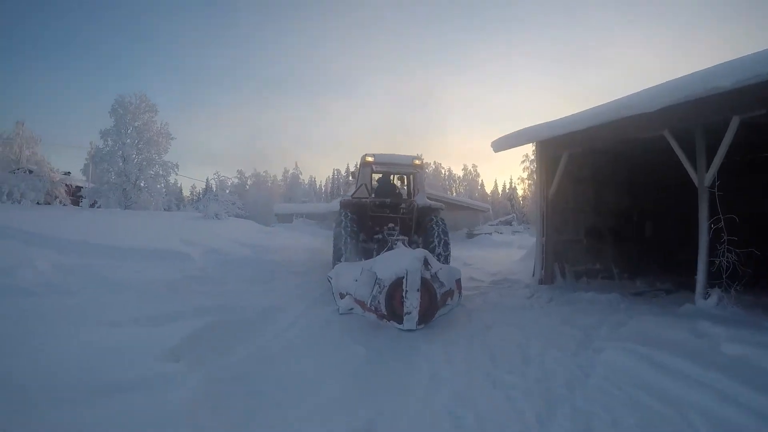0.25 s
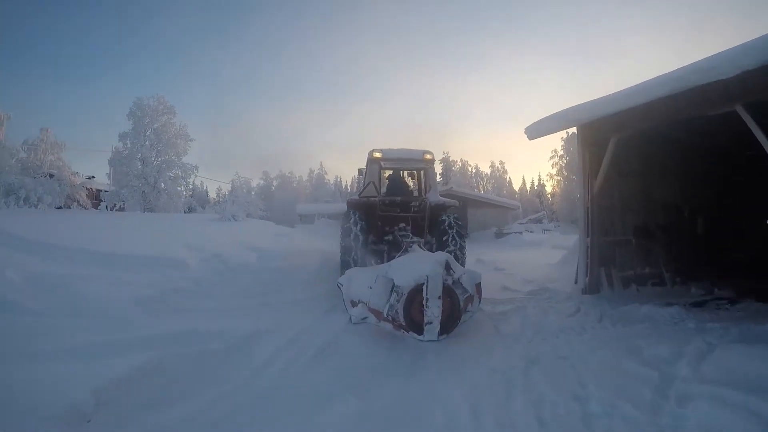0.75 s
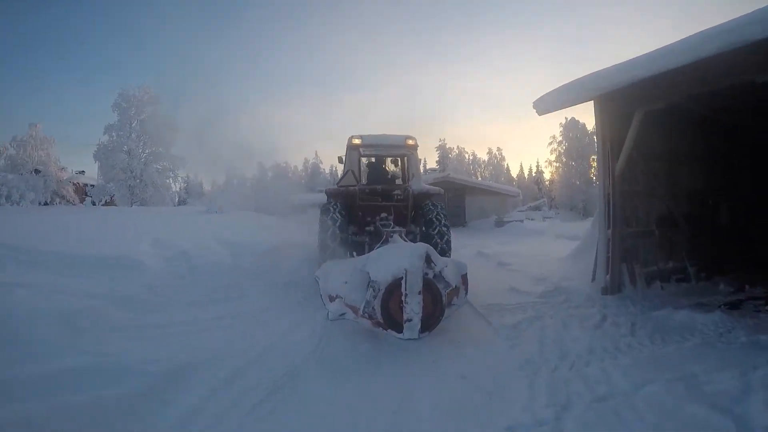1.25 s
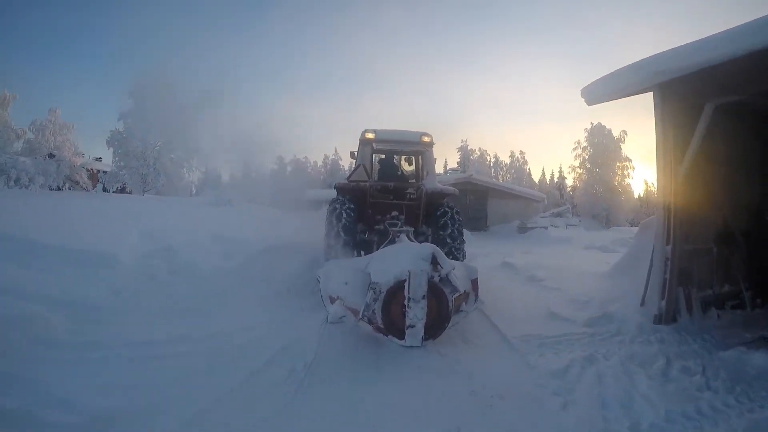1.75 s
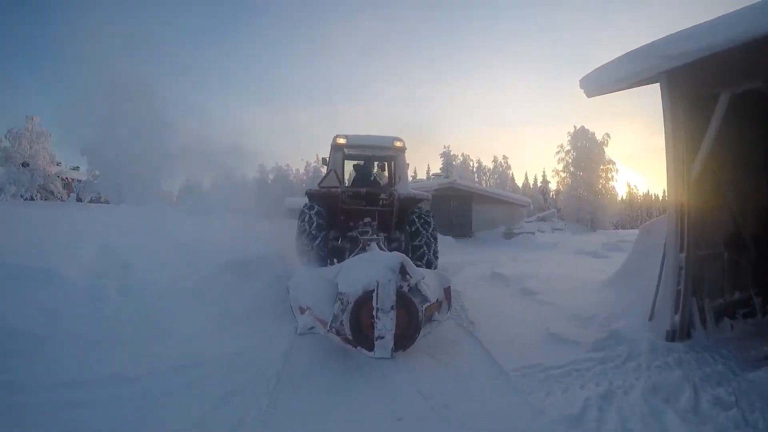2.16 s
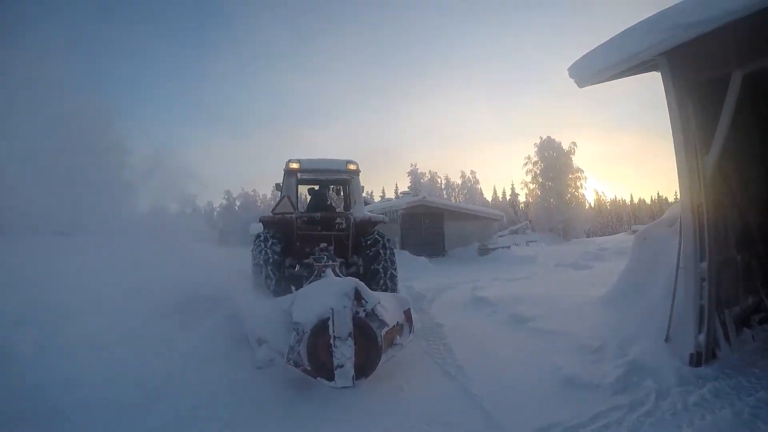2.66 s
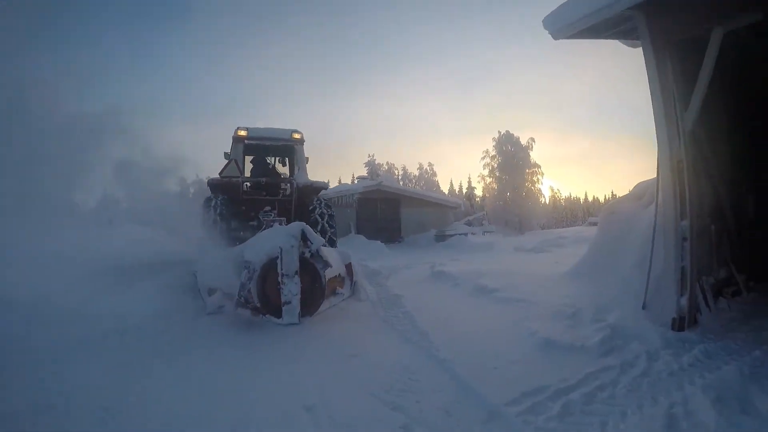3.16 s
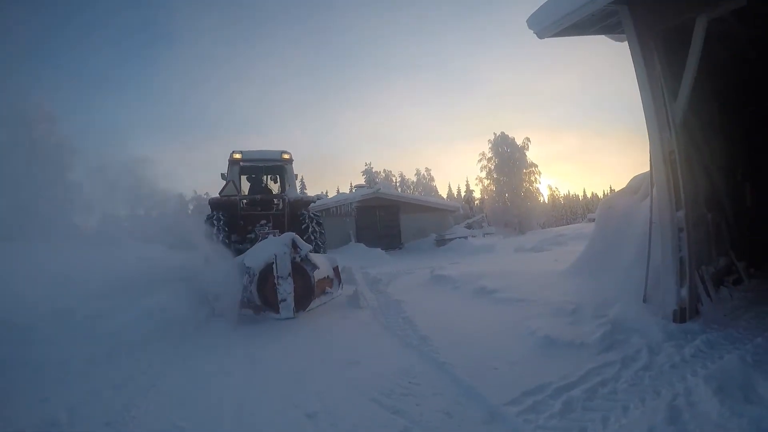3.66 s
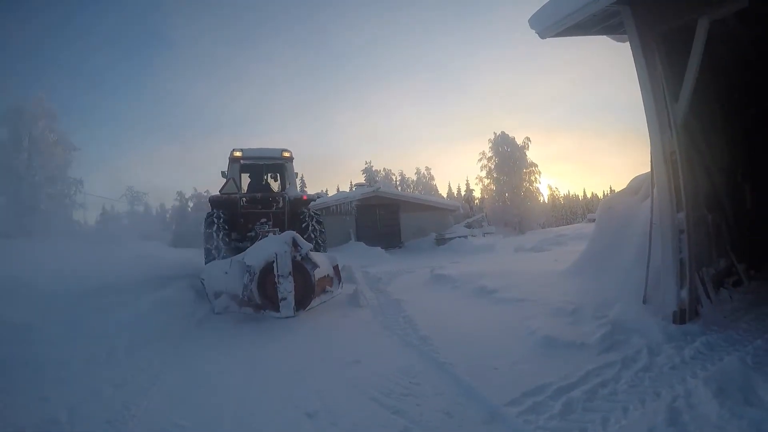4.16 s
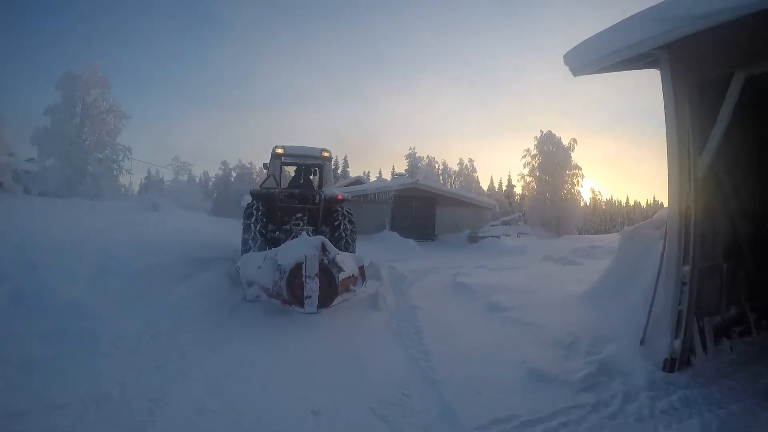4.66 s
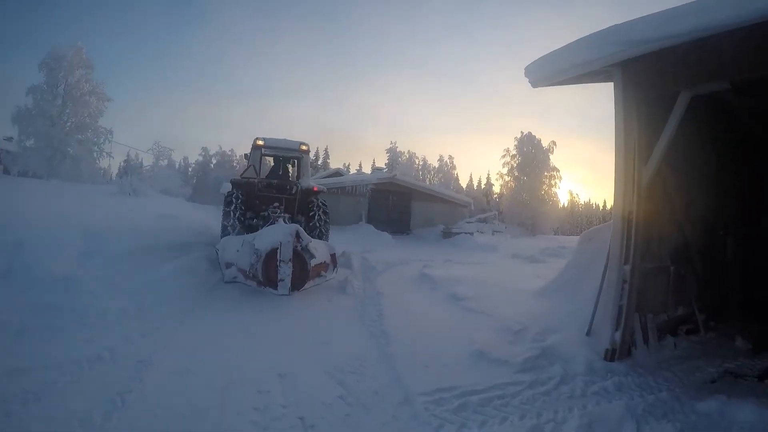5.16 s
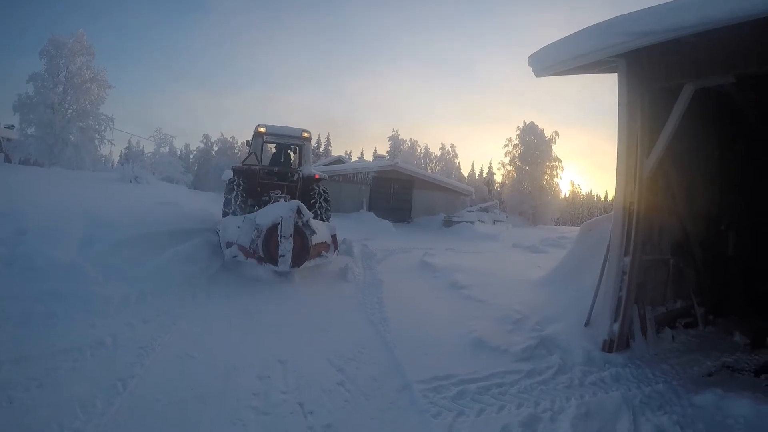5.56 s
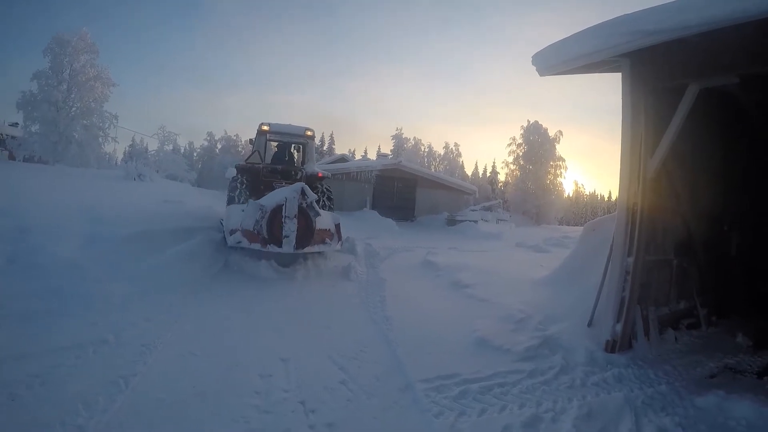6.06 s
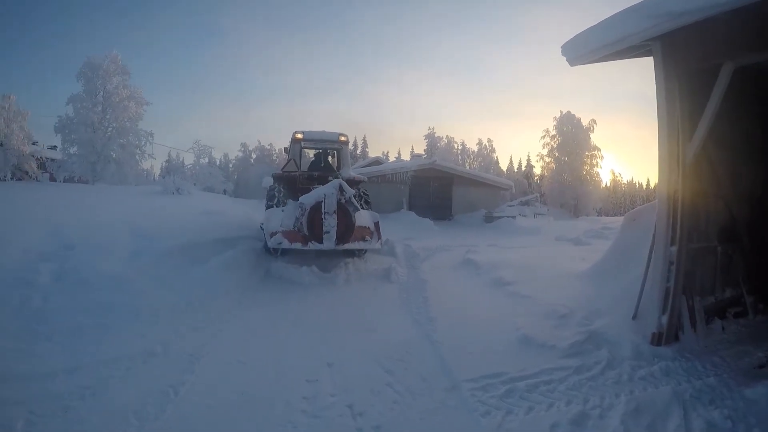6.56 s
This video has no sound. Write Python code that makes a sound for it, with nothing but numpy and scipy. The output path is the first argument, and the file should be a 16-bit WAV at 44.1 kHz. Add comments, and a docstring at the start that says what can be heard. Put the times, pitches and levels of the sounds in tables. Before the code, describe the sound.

A tractor engine rumbles and a snowblower hums and hisses across snow, then loud glove rubbing and knocks hit the housing before a faint rattling diesel idle.

```python
"""Engine rumble and a rising blade tone come first, with the hiss of thrown snow: a tractor drives a
snowblower across a snowy yard, heard through a small camera's closed housing. Shaped noise and sines.
A gloved hand rubs (grainy noise), squeaks (slip partials) and knocks (decaying sines) the housing,
and its mount is left ringing low. Later the idling diesel rattles sheet metal: noise in panel bands."""
import sys
import numpy as np
from scipy import signal
from scipy.fft import rfft, irfft, next_fast_len
from scipy.io import wavfile
from scipy.ndimage import uniform_filter1d

SR = 44100
rng = np.random.default_rng(int(sys.argv[2]) if len(sys.argv) > 2 else 0)


def master_out(mix):
    """Clip the mix to full scale and print it as 16-bit PCM to the path in sys.argv[1]."""
    frames = np.transpose(np.atleast_2d(mix))
    ceiling = np.clip(frames, -1, 1)
    pcm = np.round(ceiling * 32767).astype(np.int16)
    wavfile.write(sys.argv[1], SR, pcm)


N = 300577


def amp(db):
    """Decibels to gain."""
    return 10 ** (np.asarray(db) / 20)


def rms_one(x):
    """Scale to unit rms."""
    return x / np.sqrt(np.mean(x ** 2) + 1e-20)


def clock_s():
    """Time of each sample."""
    return np.arange(N) / SR


def noise():
    """White noise."""
    return rng.standard_normal(N)


def in_time(rows):
    """Interpolate each column of a curve table to one value a sample."""
    s, *columns = np.transpose(rows)
    return [np.interp(clock_s(), s, c) for c in columns]


def colour(x, spectrum):
    """Shape x by a (Hz, dB) spectrum, log-frequency interpolation; rms 1."""
    size = next_fast_len(N)
    hz, db = np.transpose(spectrum)
    grid_hz = np.maximum(np.arange(size // 2 + 1) * SR / size, 1)
    gain = amp(np.interp(np.log(grid_hz), np.log(hz), db))
    return rms_one(irfft(rfft(x, size) * gain, size)[:N])


def bandpass(x, low_hz, high_hz):
    """Butterworth band-pass, level kept."""
    return signal.sosfilt(signal.butter(2, [low_hz, high_hz], "band", fs=SR, output="sos"), x)


def band(x, low_hz, high_hz):
    """Band-pass, rms 1."""
    return rms_one(bandpass(x, low_hz, high_hz))


def drift(rate_hz):
    """Slow random wander of spread 1: two-pole low-passed noise."""
    step = 40   # samples per slow value
    r = np.exp(-2 * np.pi * step * rate_hz / SR)
    settle = 2000
    slow = signal.lfilter([1], [1, -2 * r, r * r], rng.standard_normal(N // step + 2 + settle))[settle:]
    return np.interp(np.arange(N) / step, np.arange(len(slow)), rms_one(slow))


def ring(s, hz, t60_s):
    """Exponentially decaying sine, initial height 1, starting at s."""
    t = np.maximum(clock_s() - s, 0)
    return np.sin(2 * np.pi * hz * t) * amp(-60 * t / t60_s)


def bursts(s, db, rise_s, fall_s):
    """Envelope of short bursts: quick rise, exponential fall, peak at db."""
    marks = np.full(N, 1e-12)
    marks[(np.array(s) * SR).astype(int)] = amp(db)
    t = np.arange(int(8 * fall_s * SR)) / SR
    shape = np.exp(-t / fall_s) * (1 - np.exp(-t / rise_s))
    return signal.fftconvolve(marks, shape / shape.max())[:N]


# tractor, muffled while the housing is gripped: [t/s, rumble level/dB, body drone level/dB, hiss level/dB]
TRACTOR_CURVE = [(0.0, -39, -55.5, -59), (1.3, -43.5, -51.5, -53.5), (3.0, -39, -48, -55),
                 (3.55, -49, -51, -60), (3.76, -71, -61, -62), (4.08, -71, -57, -60.5),
                 (4.3, -35.5, -45, -59), (4.42, -40, -57, -62), (6.2, -50.5, -57.5, -65),
                 (6.55, -48, -55.5, -66), (6.82, -48, -56.5, -62)]
# blower fan, runs up, holds its pitch, then fades out: [t/s, blade rate f/Hz, tone level/dB,
# overtone level/dB]
BLOWER_CURVE = [(0.0, 128.8, -52.5, -58.5), (0.6, 164.2, -46.5, -57), (3.0, 171, -49.5, -54.5),
                (3.5, 169, -65.5, -69.5), (4.1, 169.8, -62.5, -74), (4.6, 171.5, -83, -82)]


def tractor():
    """Engine and blower together; drone and hiss share one lumpy wander, tones and throb one fan phase."""
    rumble_db, drone_db, hiss_db = in_time(TRACTOR_CURVE)
    blade_hz, tone_db, overtone_db = in_time(BLOWER_CURVE)
    blade_phase = 2 * np.pi * np.cumsum(blade_hz * (1 + .003 * drift(3.4))) / SR
    lumps = drift(14)
    engine = exhaust_rumble(rumble_db) + body_drone(drone_db, lumps)
    tones = blade_tones(blade_phase, tone_db, overtone_db)
    return engine + tones + snow_hiss(blade_phase, tone_db, hiss_db, lumps)


# exhaust rumble spectrum: [f/Hz, relative level/dB per Hz]
RUMBLE_SPECTRUM = [(15, -57.5), (25, -32), (38, -16), (54, -18.5), (77, -5.5), (96, 0.5), (112, -2),
                   (200, -21.5), (260, -51), (440, -120)]


def exhaust_rumble(level_db):
    """Exhaust: low shaped noise with lumpy level."""
    return amp(level_db + 1.9 * drift(21)) * colour(noise(), RUMBLE_SPECTRUM)


# body drone spectrum: [f/Hz, relative level/dB per Hz]
DRONE_SPECTRUM = [(88, -45.5), (150, -4), (215, -11), (273, -3.5), (351, -14), (519, -15), (690, -29),
                  (822, -27.5), (979, -32), (1100, -35), (1430, -63), (2420, -120)]


def body_drone(level_db, lumps):
    """Tractor body: mid-low shaped noise with lumpy level."""
    return amp(level_db + 1.6 * lumps) * colour(noise(), DRONE_SPECTRUM)


def blade_tones(blade_phase, tone_db, overtone_db):
    """Fan: sines at the blade rate and its octave, plus a weaker shaft order at 3/2 between them."""
    tone = amp(tone_db + 1.5 * drift(2.7)) * np.sin(blade_phase)
    overtone = amp(overtone_db + 1.4 * drift(5.2)) * np.sin(2 * blade_phase)
    shaft_order = amp(overtone_db - 6.0 + 1.2 * drift(2)) * np.sin(3 * blade_phase / 2)
    return np.sqrt(2) * (tone + overtone) + shaft_order


BLADES, THROB_DB = 4, 1.3
# snow and engine noise through the housing: [f/Hz, relative level/dB per Hz]
HISS_SPECTRUM = [(410, -20), (700, 0.5), (984, -12), (1180, -6.5), (1680, -9), (1940, -5), (3280, -15.5),
                 (3890, -11.5), (5470, -13.5), (6150, -8.5), (9860, -11.5), (10800, -4), (11800, -13),
                 (13500, -7.5), (16000, -16)]
# hiss once the blower has stopped throwing: [f/Hz, relative level/dB per Hz]
FAR_HISS_SPECTRUM = [(410, -30), (700, 0.5), (1020, -9), (1480, -5.5), (4210, -12.5), (6150, -9),
                     (7290, -9.5), (10700, -7.5), (16000, -12)]


def snow_hiss(blade_phase, tone_db, hiss_db, lumps):
    """Thrown snow: noise throbbing once per fan turn, crossfading to the far hiss as the tone fades."""
    throwing = np.clip((tone_db + 68) / 15, 0, 1)
    throb_db = THROB_DB * throwing * np.sin(blade_phase / BLADES)
    level = amp(hiss_db + throb_db + 0.49 * lumps + .9 * drift(25))
    near = np.sqrt(throwing) * colour(noise(), HISS_SPECTRUM)
    far = np.sqrt(1 - throwing) * colour(noise(), FAR_HISS_SPECTRUM)
    return level * (near + far)


SMALL_LUMPS_PER_S, SMALL_LUMP_MIN_DB, SMALL_LUMP_RANGE_DB = 4.0, -57, 6
THROWING_START_S, THROWING_END_S = 0.37, 3.0
DULL_DB = -9.5   # duller part, re each lump
# big lumps of snow in the blower: [t/s, envelope peak level/dB]
BIG_LUMPS = [(1.246, -45.5), (1.4402, -45), (1.5886, -52), (2.134, -50), (2.2489, -47), (2.3219, -44.5),
             (2.442, -38.5), (2.604, -43.5)]


def snow_lumps():
    """Lumps hit the blower: milliseconds of bright noise with a duller part; small ones at random times."""
    span_s = THROWING_END_S - THROWING_START_S
    when, size = rng.random((int(SMALL_LUMPS_PER_S * span_s), 2)).T
    small = [THROWING_START_S + span_s * when, SMALL_LUMP_MIN_DB + SMALL_LUMP_RANGE_DB * size]
    s, db = np.hstack([np.transpose(BIG_LUMPS), small])
    bright = bursts(s, db, 0.00043, 0.0048) * band(colour(noise(), HISS_SPECTRUM), 2800, 20000)
    dull = bursts(s, db + DULL_DB, 0.00036, 0.0096) * band(noise(), 1560, 2420)
    return bright + dull


SHOWER_S, SHOWER_GAP_S, SHOWER_DB, SHOWER_GRAINS = 1.131, 0.012, -50.5, 6
# single ice grains: [t/s, envelope peak level/dB]
ICE_GRAINS = [(0.1462, -48.5), (0.9772, -45), (1.9994, -49.5)]


def ice_grains():
    """Small ice grains tinkle: short high noise bursts, singly and in one irregular row."""
    shower = [(SHOWER_S + SHOWER_GAP_S * (k + rng.uniform(-0.48, 0.23)), SHOWER_DB)
              for k in range(SHOWER_GRAINS)]
    s, db = np.transpose(ICE_GRAINS + shower)
    return bursts(s, db, .0005, 0.0036) * band(noise(), 9400, 14500)


GRID_START_S, FIRING_S, FIRINGS, LEAD_S = 4.9626, 0.0509, 37, .002   # bursts start LEAD_S before the grid
HURRY_FROM_S, HURRY_S_PER_S2 = 6.13, 0.033   # the idle then speeds up slightly
PANELS_DB, RATTLE_DB, EVERY_OTHER_DB, SPREAD_DB = -54, -59.5, 0.3, 1.1
PANELS_FULL_S, PANELS_GROW_DB_PER_S = 6.42, 8   # the panels join in gradually
PANELS_FADE_S, PANELS_FADE_DB_PER_S = 6.31, 13   # and recede with distance
SECOND_S, SECOND_DB = 0.0141, -6   # each firing is heard as two bursts
# sheet-metal panel resonances: [f/Hz, width/Hz, relative level/dB]
PANEL_MODES = [(526, 350, -1.5), (800, 61, -0.5), (1480, 32, -3), (1636, 106, -6.5), (1890, 310, -1.5),
               (2466, 190, -2.5)]


def diesel_idle():
    """Idling diesel fires about 20 times a second, shaking sheet metal: panel-band noise, bright rattle."""
    firing = np.arange(FIRINGS)
    grid_s = GRID_START_S + FIRING_S * firing
    s = grid_s - HURRY_S_PER_S2 * np.maximum(grid_s - HURRY_FROM_S, 0) ** 2 - LEAD_S
    vary_db = SPREAD_DB * rng.standard_normal(FIRINGS) + EVERY_OTHER_DB * (-1) ** (firing + 1)
    growth_db = -PANELS_GROW_DB_PER_S * np.maximum(PANELS_FULL_S - s, 0)
    fade_db = -PANELS_FADE_DB_PER_S * np.maximum(s - PANELS_FADE_S, 0)
    first = np.array([s, PANELS_DB + vary_db + growth_db + fade_db, RATTLE_DB + vary_db])
    second = first + np.array([[SECOND_S], [SECOND_DB], [SECOND_DB]])
    s, panels_db, rattle_db = np.hstack([first, second])
    shake, panels = noise(), 0
    for hz, width_hz, level_db in PANEL_MODES:
        panels = panels + amp(level_db) * band(shake, hz - width_hz / 2, hz + width_hz / 2)
    rattle = band(colour(noise(), HISS_SPECTRUM), 2900, 12700)
    shaken = bursts(s, panels_db, 0.00033, 0.0087) * rms_one(panels)
    return shaken + bursts(s, rattle_db, 0.00061, 0.0071) * rattle


RELEASE_DB_PER_S = 699   # after the drop
SNAP_DB, SNAP_MIN_DROP_DB = 0.5, 10   # the fabric snaps free where the drop is deeper than this
# glove strokes: [start t/s, length/s, final level/dB, swell start to end/dB, drop on letting go/dB]
STROKES = [(3.038, .012, -4, 8, 12), (3.074, 0.029, -11.5, 1.1, 11.5), (3.148, 0.097, -8.5, 33, 20),
           (3.268, 0.032, -35, 9, 5), (3.299, 0.015, -6.5, 14.5, 18.5), (3.318, 0.0076, -9, 0.5, 9.5),
           (3.327, .04, -19.5, 2, 10), (3.382, .012, -11, 23, 15), (3.41, 0.02, -25.5, -3, 11),
           (3.433, 0.011, -29, -2, 3), (4.113, 0.028, -35, 12, 0.1), (4.138, 0.035, -33, 1.5, 3),
           (4.181, 0.034, -34.5, 7.5, 1)]


def strokes():
    """Stroke envelope: level runs linearly in dB, drops on letting go; deep drops add a snap burst."""
    t, out = clock_s(), np.zeros(N)
    for start, length, db, swell_db, drop_db in STROKES:
        left = start + length - t
        change_db = np.where(left > 0, -swell_db * left / length, RELEASE_DB_PER_S * left - drop_db)
        out = np.maximum(out, (t >= start) * amp(np.minimum(db + change_db, 0)))
    snapping = [row for row in STROKES if row[-1] > SNAP_MIN_DROP_DB]
    start, length, db, _, _ = np.transpose(snapping)
    snaps = bursts(start + length - .001, db + SNAP_DB, .0002, .0007)
    return uniform_filter1d(out, size=40) + snaps


SOFT_FROM_S = 4.0
RANGE_EDGES_HZ = [600, 1500, 3500, 5500, 7600, 10500, 16500]
# glove fabric on the housing: [f/Hz, relative level/dB per Hz]
RUB_SPECTRUM = [(410, -34.5), (700, -13.5), (886, -14), (1380, -34), (1680, -34.5), (2080, -21.5),
                (2730, -12.5), (3280, -16), (4730, -11.5), (6150, 2), (7790, -5.5), (9110, 3),
                (11200, -7.5), (13100, -7), (16000, -20.5)]
# a lighter, slower stroke: [f/Hz, relative level/dB per Hz]
SOFT_RUB_SPECTRUM = [(1060, -67), (1800, -33), (2120, -18), (3320, -20.5), (3810, -3), (4740, -12.5),
                     (6470, 5.5), (7220, -7.5), (8520, -7), (13100, -11), (16000, -20)]
# small clicks of the glove on the housing: [t/s, envelope peak level/dB]
GLOVE_TAPS = [(3.598, -45.5), (3.6421, -52), (3.6964, -59.5), (4.03, -46.5), (4.1914, -53), (4.215, -39)]


def glove():
    """Rubbing: grainy noise under each stroke, patchy in colour, which also pushes the housing; taps."""
    stroke = strokes()
    hard, soft = colour(noise(), RUB_SPECTRUM), colour(noise(), SOFT_RUB_SPECTRUM)
    fabric = np.where(clock_s() < SOFT_FROM_S, hard, soft)
    grain, rub = drift(150), 0
    for low_hz, high_hz in zip(RANGE_EDGES_HZ, RANGE_EDGES_HZ[1:]):
        # the contact point wanders, so each range swells on its own
        rub = rub + amp(2 * grain + 1.6 * drift(60)) * bandpass(fabric, low_hz, high_hz)
    s, db = np.transpose(GLOVE_TAPS)
    taps = bursts(s, db, 0.00028, 0.0012) * fabric
    push = amp(-8.0) * band(noise(), 120, 270.0) + amp(-34.5) * band(noise(), 760, 1054)
    return stroke * (rub + push) + taps


UNSTEADY, SWELL_S = 0.011, 0.0089   # relative slip-rate wander; fade in and out
# stick-slip squeaks: [start t/s, turn t/s, end t/s, slip rate f/Hz at these three moments (3 columns),
# level/dB, extra level/dB of partials near 4 kHz]
SLIPS = [(3.18, 3.212, 3.226, 810, 1330, 1340, -25, 4), (3.274, 3.299, 3.317, 1015, 965, 690, -24, -16),
         (3.74, 3.758, 3.787, 680, 880, 915, -53, 12), (3.835, 3.85, 3.86, 900, 1000, 1040, -61, -10)]
# partial levels as shaped by the housing: [f/Hz, relative level/dB]
SQUEAK_SPECTRUM = [(1600, -26), (2000, -15), (2400, -28), (3500, -13.5), (4500, -23), (5800, -16.5),
                   (7000, -6), (8500, -9.5), (10500, 3), (13500, -7), (15000, -30.5)]


def squeaks():
    """Stick-slip: regular slips give a stack of partials, slightly unsteady, shaped by the housing."""
    t, out = clock_s(), np.zeros(N)
    shape_hz, shape_db = np.transpose(SQUEAK_SPECTRUM)
    k = np.arange(1, 16)[:, None]   # partial numbers
    for start, turn, end, hz0, hz1, hz2, db, mid_db in SLIPS:
        now = (t >= start) & (t < end)
        glide_hz = np.interp(t[now], [start, turn, end], [hz0, hz1, hz2])
        slips_hz = glide_hz * (1 + UNSTEADY * drift(150)[now])
        partials_hz = k * slips_hz
        near_4k = np.abs(partials_hz - 4300) < 1700
        gains = amp(np.interp(partials_hz, shape_hz, shape_db) + mid_db * near_4k)
        phase = 2 * np.pi * k * np.cumsum(slips_hz) / SR + k ** 2   # k ** 2 spreads the start phases
        stack = np.sum(gains * np.sin(phase), axis=0)
        swell = np.clip(np.minimum(t[now] - start, end - t[now]) / SWELL_S, 0, 1)
        out[now] = amp(db) * swell * rms_one(stack)
    return out


GRIP_T60_S, PANEL_SPREAD_DB = 0.049, 3.0   # ring of the main pitch; chance in panel level
# knocks on the housing: [t/s, start level/dB before filtering, main pitch f/Hz]
HOUSING_KNOCKS = [(3.042, -13.5, 194), (3.051, -2, 193), (3.084, -17.5, 178), (3.106, -6.5, 96.5),
                  (3.245, -2.5, 255), (3.255, -6, 118), (3.263, -12, 275), (3.281, -6.5, 105),
                  (3.312, -4.5, 170), (3.323, -9.5, 200), (3.340, -14, 254), (3.354, -9, 111.4),
                  (3.366, -5, 270), (3.397, -4, 221), (3.417, -9, 284), (3.429, -8.5, 307),
                  (4.121, -34.5, 235), (4.138, -23, 301), (4.186, -28, 138), (4.208, -20.5, 244),
                  (4.23, -27, 120), (5.924, -44, 295)]
# housing panels: [f/Hz, level re knock/dB, t60/s]
HOUSING_PANELS = [(388, -7, .04), (878, -13, 0.029)]


def knocks():
    """Each knock rings the housing panels briefly; how it is held sets the main pitch."""
    out = 0
    chances = rng.standard_normal((len(HOUSING_KNOCKS), len(HOUSING_PANELS)))
    for (s, db, hz), chance in zip(HOUSING_KNOCKS, chances):
        out = out + amp(db) * ring(s, hz, GRIP_T60_S)
        for (panel_hz, panel_db, t60_s), c in zip(HOUSING_PANELS, chance):
            out = out + amp(db + panel_db + PANEL_SPREAD_DB * c) * ring(s, panel_hz, t60_s)
    soft = signal.butter(3, 680, fs=SR, output="sos")   # the padded glove has no sharp contact
    small = signal.butter(4, 60, "high", fs=SR, output="sos")   # the small housing carries no deep bass
    return signal.sosfilt(np.vstack([soft, small]), out)


HELD_T60_S = 0.22
# jolts of the mount: [t/s, level/dB before filtering, free if above 0.5, else held]
MOUNT_JOLTS = [(3.112, -11.5, 0.017), (3.44, -19.5, 1), (4.21, -24.5, 0)]
# mount modes: [f/Hz, level re jolt/dB, t60 when free/s]
MOUNT_MODES = [(66.4, -6, .9), (68.0, -7, 1.1)]


def mount():
    """Two close low modes beat; a hand on the mount damps them."""
    out = 0
    for s, db, free in MOUNT_JOLTS:
        for hz, mode_db, free_t60_s in MOUNT_MODES:
            t60_s = free_t60_s if free > .5 else HELD_T60_S
            out = out + amp(db + mode_db) * ring(s, hz, t60_s)
    return bandpass(out, 45, 140)


def scene():
    """Far tractor plus the handling, which reaches the microphone through the housing."""
    far = tractor() + snow_lumps() + ice_grains() + diesel_idle()
    handling = glove() + squeaks() + knocks() + mount()
    return (far + handling)[None]


def record(dry):
    """Round the peaks (tanh), then cut the top: 70 dB down from the stopband edge at 16.3 kHz."""
    rounded = .9 * np.tanh(dry / .9)
    return signal.sosfilt(signal.cheby2(12, 70, 16300, fs=SR, output="sos"), rounded)


dry = scene()
out = record(dry)
master_out(out)
```